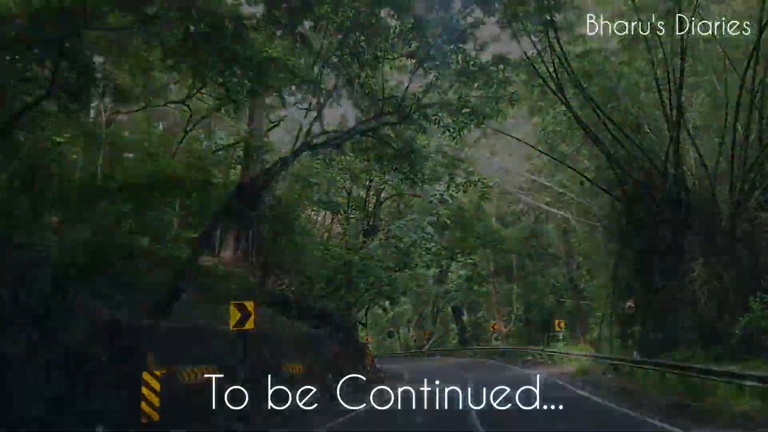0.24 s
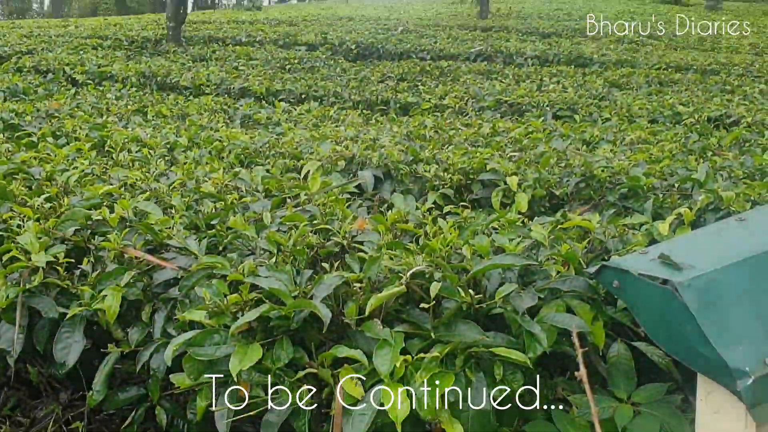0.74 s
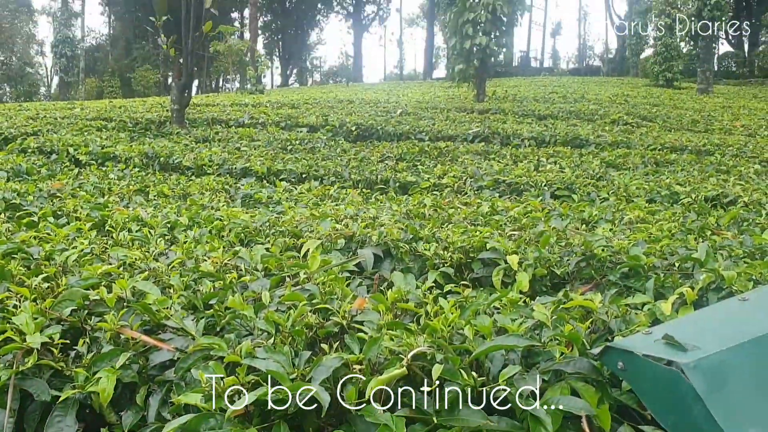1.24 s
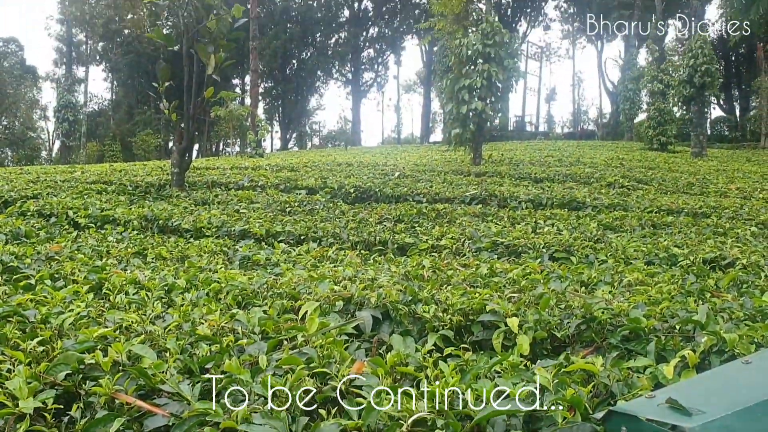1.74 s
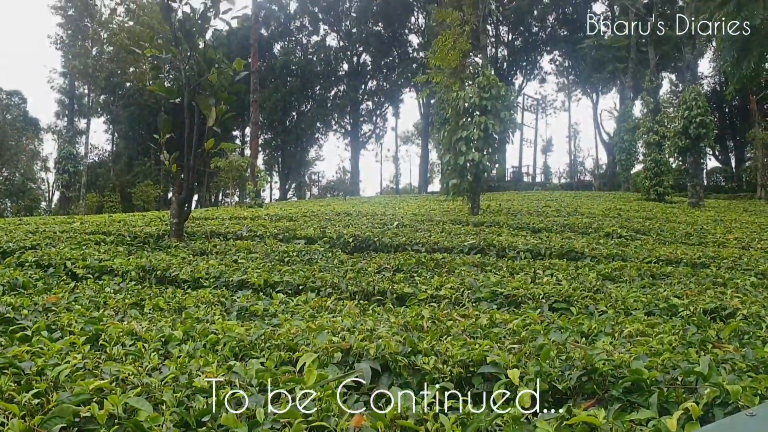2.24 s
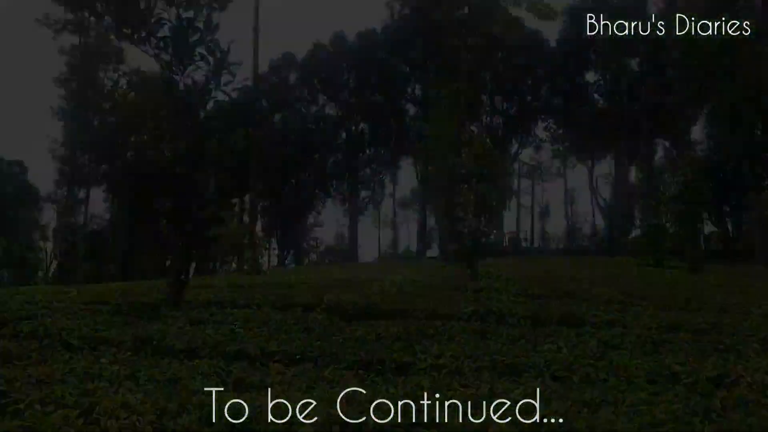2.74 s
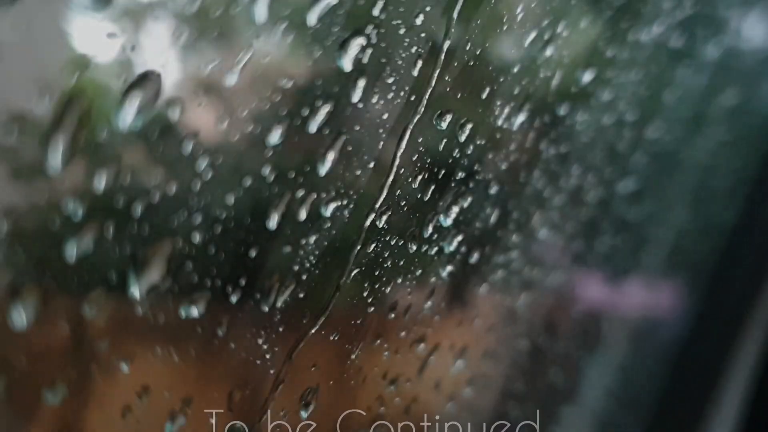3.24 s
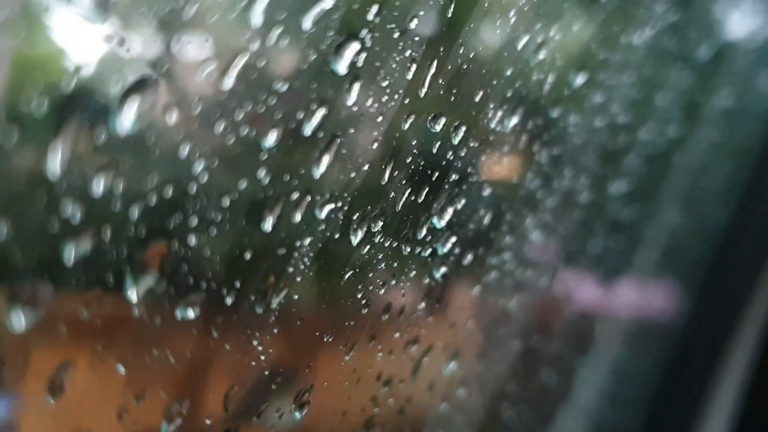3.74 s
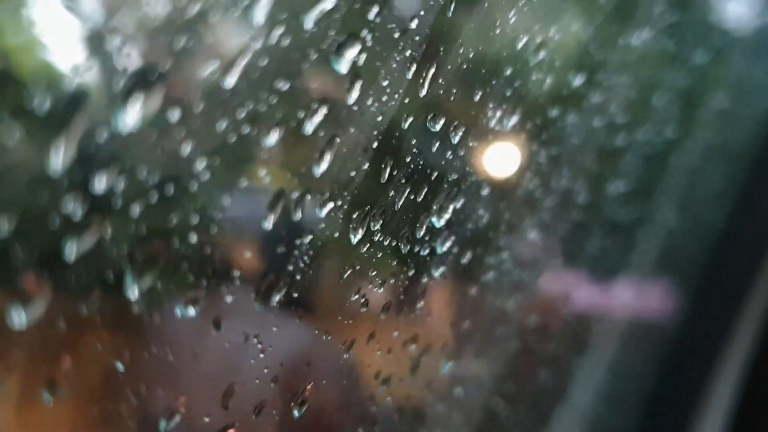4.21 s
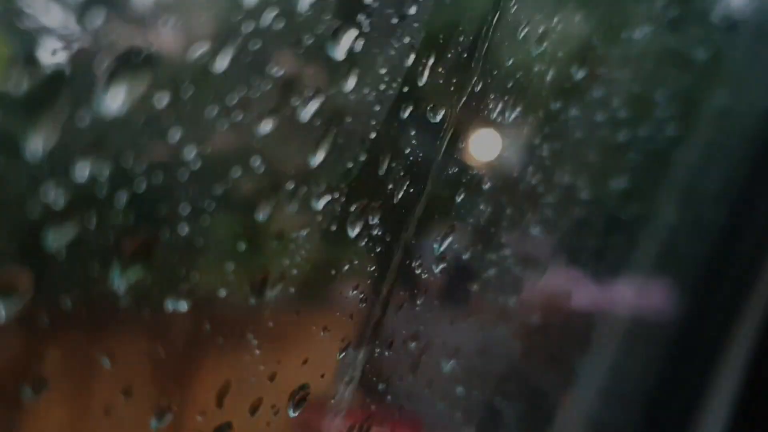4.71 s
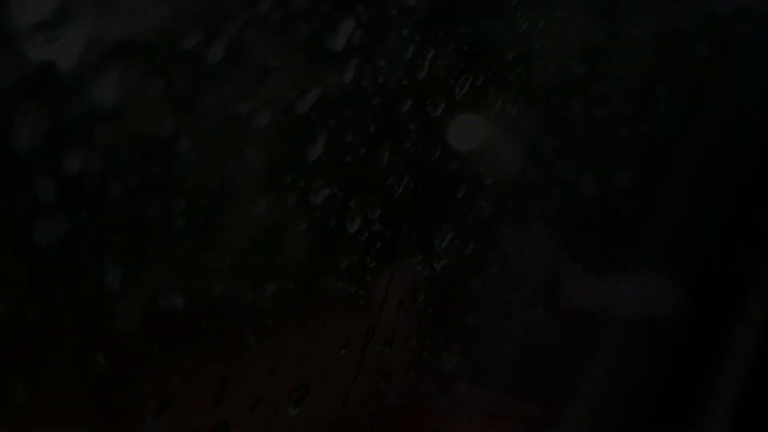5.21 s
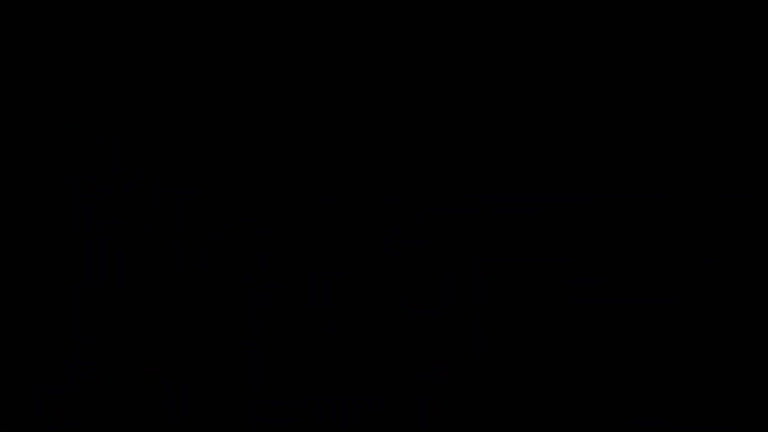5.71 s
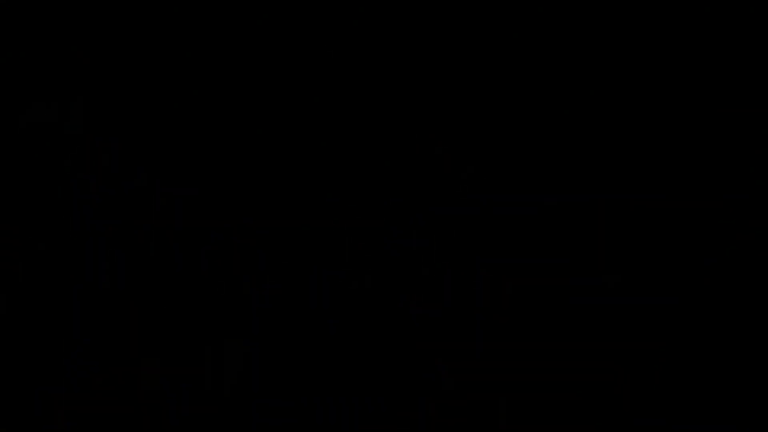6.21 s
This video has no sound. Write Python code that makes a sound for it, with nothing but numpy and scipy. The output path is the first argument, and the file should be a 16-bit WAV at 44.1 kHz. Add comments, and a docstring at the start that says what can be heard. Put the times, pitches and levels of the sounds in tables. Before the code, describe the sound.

Brief muffled road rumble, faint gliding birdsong over soft wind, a short silence, then dense rain hiss with sharp drops ticking on glass.

```python
"""Steady rain drums on a parked car, the last and longest of three scenes: a noise wash, random small drops
on the glass and timed big drops, each a spiky burst of noise with a short ring.
Before it comes a quiet hillside: birds whistle in gliding near-sine notes that echo off far trees, over wind
buffeting, a rustle, still air and a faint drone, all shaped noise. It fades to silence just before the rain.
A car cabin opens the sequence and fades into the hillside: low noise and boomy modes under tyre hiss."""
import sys
import numpy as np
from scipy import signal
from scipy.fft import rfft, irfft
from scipy.io import wavfile
from scipy.ndimage import uniform_filter1d

SR = 44100
rng = np.random.default_rng(int(sys.argv[2]) if len(sys.argv) > 2 else 0)


def master(y):
    """Save y as 16-bit WAV."""
    cut = np.clip(np.atleast_2d(y).T, -1, 1)
    pcm = np.round(cut * 32767)  # scale
    wavfile.write(sys.argv[1], SR, pcm.astype(np.int16))


N = 284531
T = np.arange(N) / SR
GAP_S = 2.179  # the silent instant between hillside and rain


def rain():
    """Wash and patter swell to one heaviest moment and fade at the close; big drops land on top."""
    heaviest_s, swell_db_per_s = 4.05, 0.88
    closing_s, closing_db_per_s = 5.2, 6.5
    strength_db = -35.5 - swell_db_per_s * abs(T - heaviest_s)
    strength_db -= closing_db_per_s * np.maximum(T - closing_s, 0)
    patter_db = -11  # under the wash
    bed = wash() + amp(patter_db) * patter()
    return bed * amp(strength_db) * fade(silent_s=GAP_S, full_s=2.724, steepness=2.15) + drops()


# Colour of the wash: freq_hz [Hz], level_db [dB per Hz, relative]
WASH_COLOUR = [(18, -76), (30, -43), (64, -35), (95, -12), (114, -2.5), (208, -2.5), (244, -3.5),
               (371, -1.5), (549, -1.5), (1140, -6.5), (1270, -5.5), (2570, -16), (5500, -24.5),
               (10900, -35.5), (15700, -46.5)]
# Stereo likeness of the wash: freq_hz [Hz], likeness [-1 to 1]
WASH_LIKENESS = [(60, 0.33), (130, 0.94), (290, 0.89), (640, 0.95), (1410, 0.58), (3100, 0.69),
                 (6820, 0.88), (15000, 0.014)]
# Stereo balance of the wash: freq_hz [Hz], left_minus_right_db [dB]
WASH_PAN = [(60, 7), (110, 5), (200, 4.5), (380, 2.5), (700, 1.5), (1290, 0.5), (2380, -1.5), (4400, 1.5),
            (8120, 2.5), (15000, 3.5)]
# Phase turn of the right channel: freq_hz [Hz], phase_rad [radians]
WASH_TURN = [(0, 9.5), (260, 0.04), (780, 0.6), (2150, -0.03), (3620, 1.5), (5170, 1.35), (5600, 2.5),
             (8350, 1.5), (10900, 4), (12000, -4), (13100, 2), (13900, -3), (14700, -4), (15400, 0)]


def wash():
    """Countless drops on roof and street blur into one coloured noise."""
    return noise(WASH_COLOUR, WASH_LIKENESS, patchy_db=0.63, size=2048, pan=WASH_PAN, turn=WASH_TURN)


# Big drops: start_s [s], level_db [dB, relative], ring_hz [Hz], bright_db [dB per octave]
BIG_DROPS = [(2.527, -45, 4280, 4), (2.542, -29.5, 4110, -5), (2.5789, -42, 4350, -4),
             (2.6683, -32, 4900, 4), (2.722, -30, 5230, 4), (2.746, -31, 3560, 2), (2.8162, -35, 4267, 3),
             (2.907, -37, 4220, 5), (2.9356, -29, 3880, 3), (2.9614, -26.5, 4680, 8),
             (3.0013, -26.5, 4100, 5), (3.077, -30, 5530, 1), (3.1006, -30, 4090, 0),
             (3.151, -27.5, 3600, 1), (3.2079, -28.5, 4440, 0.5), (3.267, -30.5, 3900, 1),
             (3.386, -29, 4310, 2), (3.43, -28, 4750, 5.5), (3.466, -33.5, 4030, 1), (3.5372, -29, 4300, 7),
             (3.556, -32.5, 4180, 1), (3.5796, -38, 4210, 3), (3.681, -28, 5600, 2),
             (3.713, -28.5, 4300, -0.5), (3.7642, -29, 3870, 0), (3.868, -25.5, 4420, 4),
             (3.911, -26, 3700, 1.5), (3.971, -25, 5230, 3), (4.013, -37, 4530, -2), (4.044, -35, 3910, -2),
             (4.107, -20.5, 4390, 8), (4.1487, -33, 3640, -1), (4.18, -29.5, 4410, 3),
             (4.2144, -33, 4840, -4), (4.284, -31, 4090, -7.5), (4.301, -32, 4070, 1),
             (4.3648, -33, 4230, 1), (4.3763, -25.5, 3800, 4), (4.403, -33, 3740, 0),
             (4.436, -35, 4610, -7), (4.4884, -25, 3780, 6.5), (4.635, -32, 3840, 3),
             (4.6788, -25, 4540, 5), (4.74, -32, 3560, 2), (4.8198, -44, 6500, 4), (4.859, -27, 4010, -7),
             (4.8832, -28.5, 5140, -3), (4.9056, -29.5, 6300, 0.5), (4.93, -27, 4120, 6),
             (4.946, -29.5, 4090, 1.5), (4.986, -26.5, 3800, 3.5), (5.097, -29, 5080, 5),
             (5.1236, -30, 5630, -1), (5.1761, -27.5, 4440, 1), (5.187, -32, 3600, -4),
             (5.316, -25, 6000, 2.5), (5.329, -29.5, 3980, -4), (5.4404, -28.5, 3900, 1.5),
             (5.485, -33.5, 3640, 0), (5.5472, -34, 6430, 5), (5.596, -32.5, 3590, 2),
             (5.6822, -33, 5760, 4), (5.732, -27, 5400, 2), (5.793, -32, 5830, 4), (5.8774, -30, 4430, 5),
             (6.1901, -31.5, 3840, 6)]


def drops():
    """Big drops burst at their moments; each channel hears a shared burst plus its own."""
    t60_s, pan_db, length = 0.032, -0.5, 2048
    out = np.zeros((2, N + 4000))
    grits = rng.standard_normal((len(BIG_DROPS), 3, 2, length))
    lucks = rng.random((len(BIG_DROPS), 2))
    for (start_s, level_db, ring_hz, bright_db), grit, luck in zip(BIG_DROPS, grits, lucks):
        shared, left, right = (splat(ring_hz, t60_s, bright_db, g, luck) for g in grit)
        pair = 0.75 * shared + np.array([left, right])
        pair *= panned(amp(level_db - 4), pan_db)[:, None]
        start = round(start_s * SR)
        out[:, start:start + length] += pair
    return glass(out[:, :N])


def patter():
    """Small drops fall at random, mostly faint, in 24 kinds that differ in ring, length and brightness."""
    drops_per_s, kinds, length = 330, 24, 2048
    out = np.zeros((3, N))  # shared, left, right
    for ring_hz in np.geomspace(2500, 9000, kinds):
        strength = amp(5.1 * np.minimum(rng.exponential(1, N), 2.6))
        hits = strength * (rng.random(N) < drops_per_s / kinds / SR)
        t60_s, bright_db, luck = rng.uniform(0.0022, 0.048), rng.uniform(-3.7, 7.2), rng.random(2)
        grits = rng.standard_normal((3, 2, length))
        shapes = np.array([splat(ring_hz, t60_s, bright_db, grit, luck) for grit in grits])
        out += signal.oaconvolve(hits[None], shapes, axes=1)[:, :N]
    lean = amp([[.8], [-.8]])
    return evened(glass(0.51 * out[0] + 0.94 * out[1:] * lean))


def splat(ring_hz, t60_s, bright_db, grit, luck):
    """A drop bursts into droplets and its splash falls back: spiky noise that dies fast, ringing a little."""
    t = T[:grit.shape[1]]
    decay_s = max(t60_s, .004)
    fall = amp(-60 * t / decay_s) * np.clip(t / 0.00044, 0, 1)
    fall += 0.96 * np.exp(-t / 0.0005)  # the sharp tick of first contact
    since_rebound = t - np.interp(luck[0], [0, 1], (0.0058, .014))
    rebound_db = np.interp(luck[1], [0, 1], (-10, -7.5))
    fall += amp(rebound_db - 60 * abs(since_rebound) / decay_s) * (since_rebound > 0)
    burst = grit[0] * amp(5.5 * grit[1]) * fall  # random gain makes the noise spiky
    r = np.exp(-np.pi * 1000 / SR)  # resonance 1000 Hz wide
    ring = signal.lfilter([1 - r * r], [1, -2 * r * np.cos(2 * np.pi * ring_hz / SR), r * r], burst)
    octaves = np.log2(np.fft.rfftfreq(len(t), 1 / SR) / 5000 + 0.048)  # the offset keeps 0 Hz finite
    sound = irfft(rfft(burst + 0.65 * ring) * amp(bright_db * octaves), len(t))
    return sound / np.linalg.norm(sound) * np.sqrt(t60_s * SR / 30)


# Colour of a drop on glass: freq_hz [Hz], level_db [dB, relative]
GLASS_COLOUR = [(300, -36), (1200, 9.5), (2500, -2), (4500, 1), (7000, -4), (11000, -15), (15800, -28)]


def glass(x):
    """Colours bursts as the window and cabin pass them on, through a short symmetric filter."""
    taps = irfft(amp(read(GLASS_COLOUR, np.fft.rfftfreq(256, 1 / SR))))
    taps = np.roll(taps, 128) * np.hanning(256)
    return signal.oaconvolve(x, taps[None] / np.linalg.norm(taps), "same")


def hillside():
    """Birds, wind, rustle, still air and drone share one fade in and out."""
    left, right = birds() + wind() + rustle() + still_air() + drone()
    lag = round(.00113 * SR)  # hillside sound reaches the left channel later
    pair = np.array([np.roll(left, lag), right])
    pair *= fade(silent_s=0.18, full_s=0.23, steepness=0.67)
    return pair * fade(silent_s=GAP_S, full_s=1.72, steepness=1)


FLUTTER_DB = 3  # rms unsteadiness of level in moving air


def birds():
    """Whistles reach the listener directly and off the trees, with a thin sizzle high up."""
    direct, sent = whistles()
    echoes = tree_echoes(sent)
    flutter = [amp(3.5 + FLUTTER_DB * wobble(count=N, hz=30)) for channel in range(2)]
    return direct + sizzle(sent) + echoes * flutter


# Whistled notes: start_s [s], glide_s [s], length_s [s], first_hz [Hz], turn_hz [Hz], last_hz [Hz],
# pan_db [dB, left minus right], second_db and third_db [dB, harmonics against the fundamental],
# direct_db [dB, gain of the direct sound only]
NOTES = [(0.819, .17, 0.24, 1937, 2095, 2152, 2, -42, -43.5, 2),
         (1.128, 0.061, .172, 3250, 1577, 1906, .1, -50, -58, -0.5),
         (1.373, 0.024, 0.032, 2700, 3094, 3050, 2, -31, -49, -5),
         (1.389, .07, 0.15, 2214, 2281, 2370, 0.5, -39, -46, 6),
         (1.489, 0.091, .185, 3344, 3140, 3227, 16.5, -34.5, -51, -4),
         (1.781, .15, .285, 2220, 3206, 3113, 11.5, -37, -41.5, -3.5)]
# Loudness through each note, with the dips and peaks of beating echoes, one list a note:
# time_s [s], level_db [dB, before direct gain and flutter]
LOUDNESS = [
    [(.82, -67), (.832, -50), (.868, -49), (.894, -55), (1.018, -44), (1.034, -70), (1.048, -45.5),
     (1.09, -57), (1.13, -66)],
    [(1.128, -57), (1.136, -48), (1.156, -46.5), (1.166, -42), (1.185, -64), (1.22, -56), (1.25, -55.5),
     (1.3, -60.5)],
    [(1.372, -47.5), (1.42, -50.5)],
    [(1.392, -52.5), (1.41, -48.5), (1.46, -51), (1.57, -55)],
    [(1.485, -62), (1.507, -48), (1.54, -44.5), (1.565, -46.5), (1.59, -50.5), (1.67, -66)],
    [(1.78, -65), (1.794, -59), (1.803, -43), (1.83, -43.5), (1.878, -43), (1.891, -33), (1.94, -47),
     (1.98, -43), (2.01, -35.5), (2.045, -38.5), (2.065, -54)],
]


def whistles():
    """Near-sines glide to a turning pitch, then drift; returns the fluttering direct sound and the tree feed."""
    waver = 0.005  # rms pitch unsteadiness as a share
    echo_pan = 0.26  # share of a note's lean that its echoes keep
    edge_s = 0.0024
    direct, sent = np.zeros((2, 2, N))
    for note, loudness in zip(NOTES, LOUDNESS):
        start_s, glide_s, length_s, first_hz, turn_hz, last_hz, pan_db, second_db, third_db, direct_db = note
        start, t = round(start_s * SR), T[:round(length_s * SR)]
        span = slice(start, start + len(t))
        pitch_hz = first_hz + (turn_hz - first_hz) * np.sin(np.pi / 2 * np.minimum(t / glide_s, 1))
        pitch_hz += (last_hz - turn_hz) * np.clip((t - glide_s) / (length_s - glide_s), 0, 1)
        pitch_hz *= 1 + waver * wobble(count=len(t), hz=50)
        phase = 2 * np.pi * (np.cumsum(pitch_hz) / SR + rng.random())
        tone = np.sin(phase) + amp(second_db) * np.sin(2 * phase) + amp(third_db) * np.sin(3 * phase)
        tone *= np.sqrt(2) * uniform_filter1d(level(loudness)[span], size=180)
        tone *= signal.windows.tukey(len(t), 2 * edge_s / length_s)
        flutter = [amp(direct_db + FLUTTER_DB * wobble(count=len(t), hz=40)) for channel in range(2)]
        direct[:, span] += panned(tone, pan_db) * flutter
        sent[:, span] += panned(tone, echo_pan * pan_db)
    return direct, sent


# Stands of trees that throw back clumps of echo: delay_s [s], spread_s [s], level_db [dB, boost]
TREE_STANDS = [(0.013, 0.0079, 13.5), (0.042, 0.0082, 1.5), (.075, .012, 6), (0.113, 0.016, 2)]


def tree_echoes(sent):
    """Trunks scatter the whistles back as sparse random reflections, stronger around each stand's delay."""
    t, t60_s = T[:SR], 1
    taps = rng.choice([-1., 1.], (2, SR)) * (rng.random((2, SR)) < .04)
    taps *= amp(2.5 * rng.standard_normal((2, SR)))  # trunks differ in size
    clumps_db = sum(db * np.exp(-((t - delay_s) / spread_s) ** 2) for delay_s, spread_s, db in TREE_STANDS)
    taps *= amp(clumps_db - 60 * t / t60_s) * np.clip(t / 0.0044, 0, 1)
    taps /= np.linalg.norm(taps, axis=1, keepdims=True)
    return signal.fftconvolve(sent, taps, axes=1)[:, :N]


# Colour of the sizzle: freq_hz [Hz], level_db [dB per Hz, relative]
SIZZLE_COLOUR = [(8000, -42.5), (9000, -4), (9900, 3.5), (10600, -9), (11000, -44.5)]
# Stereo likeness of all hillside noise: freq_hz [Hz], likeness [0 to 1]
HILL_LIKENESS = [(40, 0.97), (80, 0.95), (130, 0.4), (300, 0.48), (700, 0.17), (3000, 0.15)]


def sizzle(sent):
    """A thin band of noise high up rises and falls with the whistles, by a share of their swing."""
    smooth_s, follow = .06, .6
    power = uniform_filter1d(sent.mean(0) ** 2, round(smooth_s * SR))
    loudness = np.sqrt(abs(power)) / amp(-50)
    hiss = noise(SIZZLE_COLOUR, HILL_LIKENESS, patchy_db=4.5, size=512)
    return hiss * amp(-92) * loudness ** follow  # -92 dB at a -50 dB note


# Colour of the buffeting: freq_hz [Hz], level_db [dB per Hz, relative]
BUFFET_COLOUR = [(8.8, -30.5), (15, 12), (30, 12), (54, -34), (99, -3.5), (115, -23), (130, -18.5),
                 (170, -67.5), (290, -120)]
# Level of the buffeting noise, with its chance swells: time_s [s], level_db [dB, before the hillside fades]
BUFFET_LEVEL = [(.4, -47.5), (.5, -37), (.6, -38.5), (.68, -36.5), (.75, -40.5), (.95, -42.5), (1.012, -35),
                (1.054, -48.5), (1.126, -37), (1.3, -38.5), (1.58, -37), (1.7, -34.5), (1.876, -37),
                (2.0, -48), (2.15, -60)]


def wind():
    """Light wind buffets: deep noise, evened out and then driven by a level curve."""
    buffeting = noise(BUFFET_COLOUR, HILL_LIKENESS, patchy_db=4.5, size=4096)
    return steadied(buffeting, 0.076) * level(BUFFET_LEVEL)


# Colour of the rustle: freq_hz [Hz], level_db [dB per Hz, relative]
RUSTLE_COLOUR = [(1800, -60), (2600, -10), (3400, -6), (4300, -3), (5000, -15), (6200, -30), (8000, -62)]


def rustle():
    """An airy band of noise swells once under the first whistle."""
    centre_s, half_s = 1.0, 0.11
    swell = amp(-74) * np.exp(-((T - centre_s) / half_s) ** 4)
    return noise(RUSTLE_COLOUR, HILL_LIKENESS, patchy_db=1.5, size=512) * swell


# Colour of leaves and distance: freq_hz [Hz], level_db [dB per Hz, relative]
AIR_COLOUR = [(35, -44.5), (60, -9.5), (110, -14), (150, -25), (300, -31), (600, -42), (1400, -49),
              (2300, -54.5), (4000, -56), (7000, -68), (11000, -83), (15800, -95)]


def still_air():
    """Leaves and distance blend into a steady soft noise."""
    return noise(AIR_COLOUR, HILL_LIKENESS, patchy_db=0.5, size=2048) * amp(-49)


# Drone bands: freq_hz [Hz], width_hz [Hz], level_db [dB rms, before the hillside fades]
DRONE_BANDS = [(104, 6.5, -57.5), (206, 9.7, -64), (529, 32, -73)]


def drone():
    """A faint wavering drone of narrow noise bands."""
    return wavering(DRONE_BANDS, same=0.51)


def cabin():
    """Rumble and tyre hiss fade out together."""
    return (rumble() + tyres()) * fade(silent_s=0.44, full_s=0.026, steepness=1.65)


# Colour of the rumble: freq_hz [Hz], level_db [dB per Hz, relative]
RUMBLE_COLOUR = [(15, -6), (30, -9), (60, 9), (110, -7), (180, -16.5), (260, -20.5), (450, -26.5),
                 (750, -43), (1400, -100)]
# Stereo likeness in the cabin: freq_hz [Hz], likeness [0 to 1]
CABIN_LIKENESS = [(40, .99), (130, .96), (250, .85), (500, .34), (1000, .3), (2500, .3), (8000, .4)]
# Modes of body and cabin air: freq_hz [Hz], width_hz [Hz], level_db [dB, relative]
CABIN_MODES = [(44.24, 4, -4), (74.5, 15.6, -7.5), (137.1, 38, -15)]


def rumble():
    """Road bumps shake the car body and ring its modes: low noise plus narrow bands, evened out."""
    boom = 0.8 * noise(RUMBLE_COLOUR, CABIN_LIKENESS, patchy_db=-3, size=4096)
    boom += wavering(CABIN_MODES, same=1)
    lean = amp([[.7], [-.7]])
    return steadied(boom, 0.043) * amp(-22) * lean


# Colour of tyres and air: freq_hz [Hz], level_db [dB per Hz, relative]
TYRE_COLOUR = [(240, -37), (400, -11.5), (798, -12.5), (1570, -29), (2000, -26.5), (2770, -39),
               (3480, -32.5), (5520, -53.5), (15700, -59)]


def tyres():
    """Tyres and air hiss above the rumble as faint coloured noise."""
    return noise(TYRE_COLOUR, CABIN_LIKENESS, patchy_db=-0.5) * amp(-55)


def noise(colour, same, patchy_db, size=1024, pan=((1, 0), (2, 0)), turn=((1, 0), (2, 0))):
    """Stereo noise from random short-time spectra with drifting patches; the mono mix has rms 1."""
    frames, hz = 4 * N // size + 5, np.fft.rfftfreq(size, 1 / SR)
    a, b, c, d, patches = rng.standard_normal((frames, len(hz), 5)).T
    patches = uniform_filter1d(patches, size=12, axis=0)  # across frequency
    patches = evened(uniform_filter1d(patches, size=10, axis=1))  # across time
    likeness = np.clip(read(same, hz), -1, 1)[:, None]
    left = a + 1j * b
    right = likeness * left + np.sqrt(1 - likeness ** 2) * (c + 1j * d)
    right *= np.exp(-1j * read(turn, hz))[:, None]
    tilt = amp(read(pan, hz) / 2)[:, None]
    spectra = np.array([left * tilt, right / tilt])
    spectra *= amp(read(colour, hz)[:, None] + patchy_db * patches)
    out = signal.istft(spectra, nperseg=size, noverlap=size - size // 4)[1][:, :N]
    return out / np.sqrt(np.mean(out.mean(0) ** 2))


def wavering(modes, same):
    """Narrow bands of noise, each swelling on its own; same is the likeness of the two channels."""
    out = np.zeros((2, N))
    for hz, width_hz, db in modes:
        sway = rng.standard_normal((2, N)) + 1j * rng.standard_normal((2, N))
        sway[1] = same * sway[0] + np.sqrt(1 - same ** 2) * sway[1]
        sway = signal.sosfilt(signal.butter(2, width_hz / 2, fs=SR, output="sos"), sway)
        out += amp(db) * evened((sway * np.exp(2j * np.pi * hz * T)).real)
    return out


def wobble(count, hz):
    """Smooth random drift of rms 1: noise low-passed at hz, with the filter's start-up cut off."""
    drift = rng.standard_normal(count + SR // 5)
    return evened(signal.sosfilt(signal.butter(4, hz, fs=SR, output="sos"), drift)[SR // 5:])


def steadied(x, seconds):
    """Evens out swells slower than the given time by dividing by the smoothed level."""
    return x / np.sqrt(abs(uniform_filter1d(x.mean(0) ** 2, round(seconds * SR))) + 0.028)


def fade(silent_s, full_s, steepness):
    """Quarter-sine fade between silence and full level, either way round."""
    return np.sin(np.pi / 2 * np.clip((T - silent_s) / (full_s - silent_s), 0, 1)) ** steepness


def panned(x, pan_db):
    """Spreads a sound over two channels, pan_db being left minus right."""
    return np.array([x * amp(pan_db / 2), x / amp(pan_db / 2)])


def level(rows):
    """Gain curve from (time_s, level_db) rows."""
    return amp(np.interp(T, *np.transpose(rows)))


def read(points, hz):
    """Value of a spectrum table on a log-frequency axis."""
    f, value = np.transpose(points)
    return np.interp(np.log(hz + 1), np.log(f + 1), value)


def evened(x):
    """Scales to rms 1."""
    return x / np.sqrt(np.mean(x ** 2) + 1e-20)


def amp(db):
    """Gain from dB."""
    return 10 ** (np.asarray(db) / 20)


def scene():
    """The rain, the hillside and the cabin, each placed in time by its own fades."""
    return rain() + hillside() + cabin()


def record(dry):
    """Low-passes the mix steeply at the upper band limit."""
    edge_hz = 15830
    return signal.oaconvolve(dry, signal.firwin(511, edge_hz, window=("kaiser", 9), fs=SR)[None], "same")


dry = scene()
out = record(dry)
master(out)
```